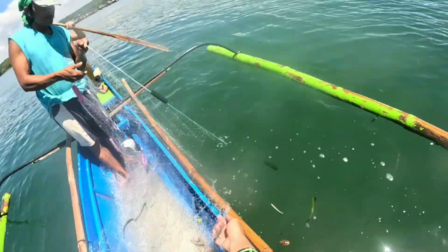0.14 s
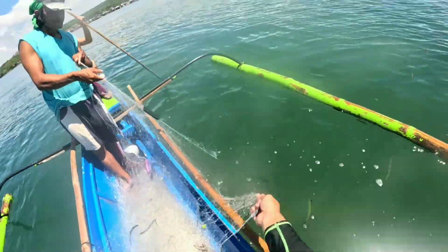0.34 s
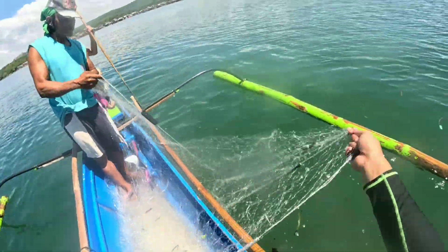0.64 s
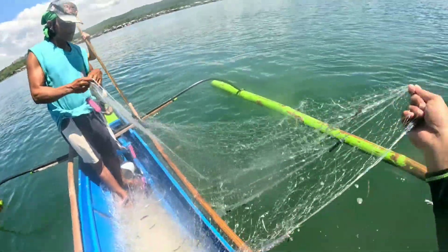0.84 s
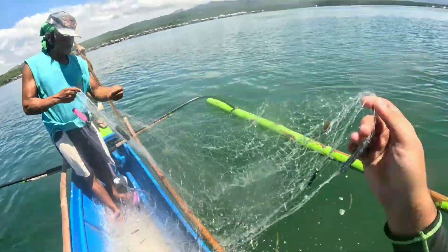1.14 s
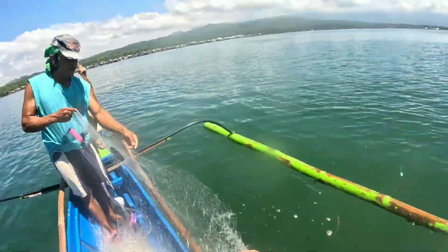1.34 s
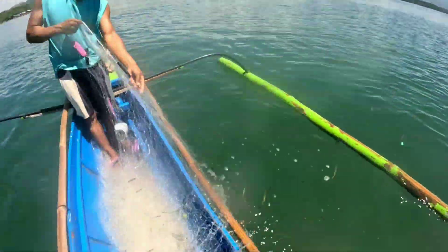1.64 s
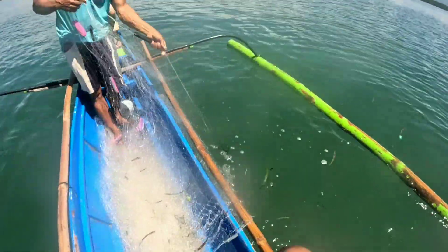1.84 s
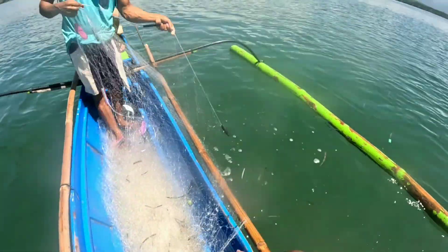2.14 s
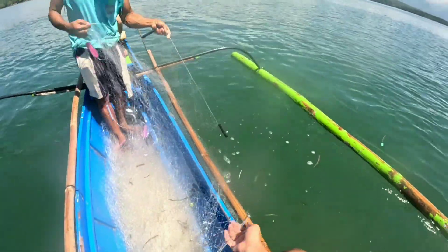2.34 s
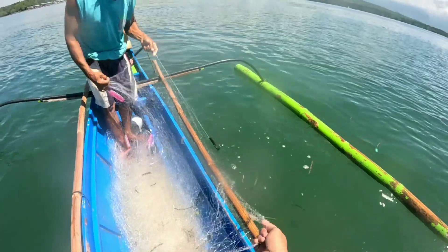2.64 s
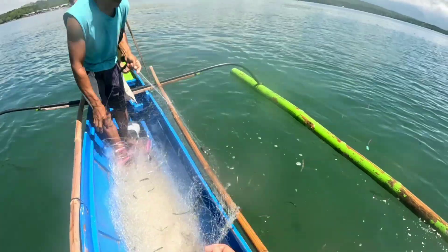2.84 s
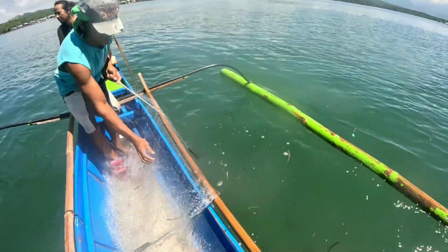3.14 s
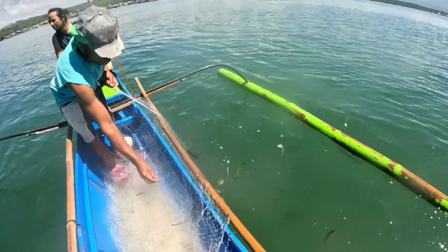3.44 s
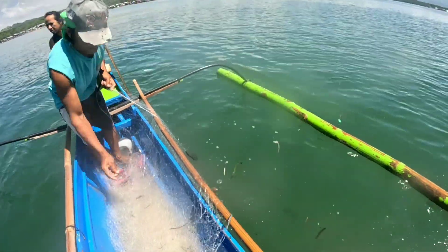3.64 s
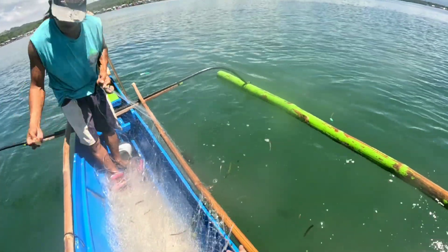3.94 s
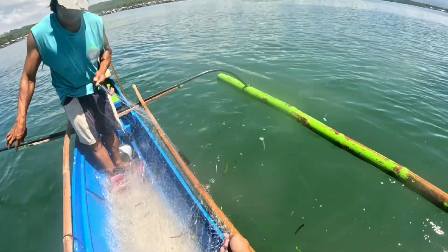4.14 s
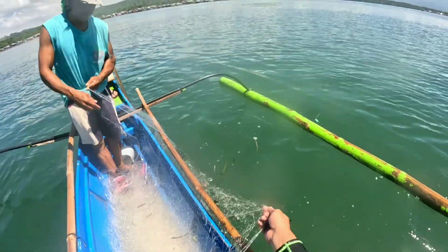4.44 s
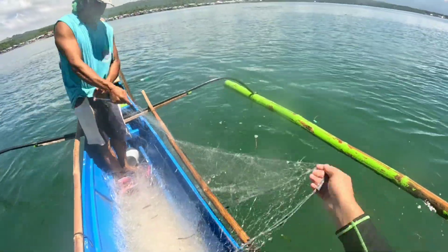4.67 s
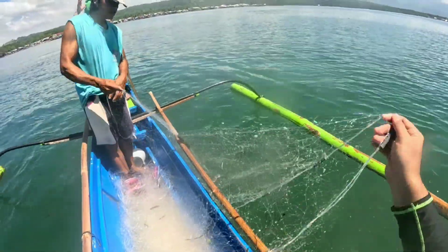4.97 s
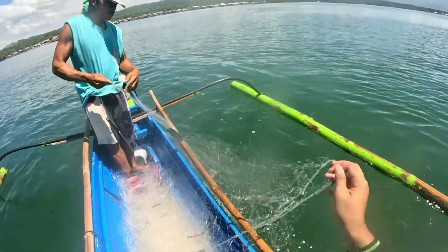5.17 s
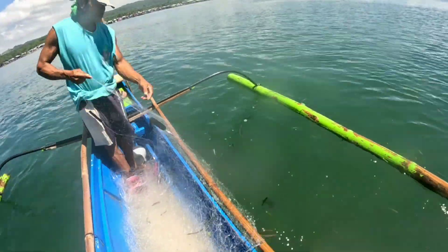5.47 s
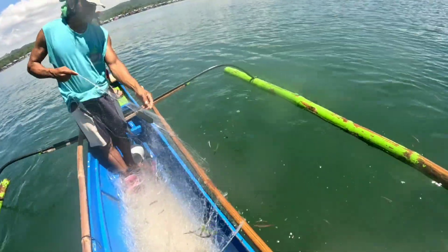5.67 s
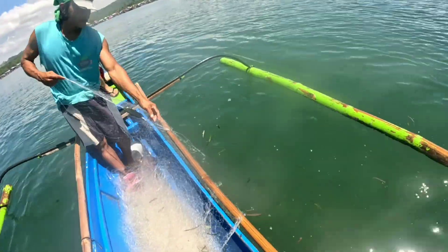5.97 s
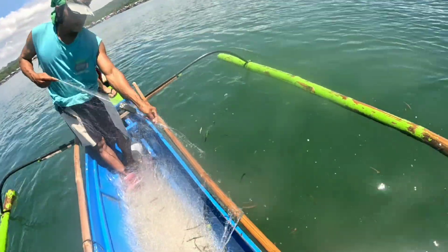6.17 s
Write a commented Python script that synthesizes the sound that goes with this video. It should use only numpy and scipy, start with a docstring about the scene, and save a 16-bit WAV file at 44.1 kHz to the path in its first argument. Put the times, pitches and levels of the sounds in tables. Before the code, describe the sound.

A wet nylon net is hauled by hand into a wooden boat, with sinkers knocking wood, mesh crackling, water dripping and low rumble beneath.

```python
"""In a wooden outrigger boat on calm water a wet nylon net is hauled in by hand, heard from the hauler's place.
Sinkers knock on the side and padded bumps hit the hull: noisy contacts that ring the modes of the wood.
Strands snap as short bands of noise; knots and mesh tap, judder and crackle over the rail as plucked tones,
ringing grains and noise; drips are gliding air bubbles, the trickle a random shower of them. Shaped noise is
the rumble of moving air; decaying low tones are the boat's slow swings and one short thud; a faint hiss stays."""
import sys
import numpy as np
from scipy import signal
from scipy.fft import rfft, irfft, next_fast_len
from scipy.io import wavfile
from scipy.ndimage import map_coordinates

SR = 44100
rng = np.random.default_rng(int(sys.argv[2]) if len(sys.argv) > 2 else 0)


def wrap_up_sound(samples):
    """Save the sound to the file named by the first command line argument, as 16-bit audio."""
    columns = np.atleast_2d(samples).T
    # keep every value between -1 and 1, then stretch to whole-number steps
    tamed = np.clip(columns, -1, 1)
    steps = np.round(tamed * 32767).astype(np.int16)
    wavfile.write(sys.argv[1], SR, steps)


N = 278271

# spectrum of trickling water: f/Hz, density/dB
TRICKLE = [(300, 0), (520, 0), (780, -25.5), (1020, 0), (1300, -3.5), (1700, -9), (2100, -4.5),
           (2500, -9.5), (3500, -29.5), (6000, -44)]
# spectrum of crackling mesh: f/Hz, density/dB
MESH = [(1500, -3.5), (2500, 0.5), (3300, 4.5), (4200, 3), (5000, -2), (7000, 5.5), (8800, 4.5),
        (10000, -7), (12000, -43.5)]
# spectrum of wet strands sliding: f/Hz, density/dB
SWISH = [(1000, 5.5), (2200, 4), (3500, 0), (4500, -13), (8000, -10.5), (11000, -48)]


def amp(db):
    """Decibels to gain."""
    return 10 ** (np.asarray(db) / 20)


def unit(x):
    """Scaled to rms 1."""
    return x / np.sqrt(np.mean(x ** 2) + 1e-20)


def along(points, hz):
    """(Hz, value) points read on a log frequency axis."""
    f, v = np.transpose(points)
    return np.interp(np.log(hz + 1), np.log(f + 1), v)


def filtered(x, response):
    """x times a response of frequency, zero-padded."""
    size = x.shape[-1]
    m = next_fast_len(size + 4096)
    return irfft(rfft(x, m) * response(np.fft.rfftfreq(m, 1 / SR)), m)[..., :size]


def coloured(x, spectrum):
    """x through a spectrum, at rms 1."""
    return unit(filtered(x, lambda hz: amp(along(spectrum, hz))))


def fade(t, t60):
    """A decay of 60 dB in t60."""
    return np.exp(-np.log(1000) * t / t60)


def swell(start, hold, attack, release):
    """A gain that builds up to start, holds, then dies away; attack and release are time constants in s."""
    t = np.arange(N) / SR - start
    return np.exp(np.minimum(t, 0) / attack - np.maximum(t - hold, 0) / release)


def clumping(per_s, depth_db):
    """A gain that wanders smoothly between random levels, per_s of them a second."""
    position = np.arange(N) * per_s / SR
    levels = rng.standard_normal(int(position[-1]) + 2)
    return amp(depth_db * map_coordinates(levels, [position]))


def add(track, s, sound):
    """Mix a sound into a track at time s."""
    part = track[max(round(s * SR), 0):][:len(sound)]
    part += sound[:len(part)]


def bubble(t, hz, cycles, glide):
    """A trapped air bubble rings for a t60 of so many cycles and glides in pitch as it moves under the surface."""
    life = cycles / hz
    phase = 2 * np.pi * hz * (t + glide * t * t / (2 * life))
    return np.sin(phase) * fade(t, life) * (1 - np.exp(-t * hz))


def grains(per_s, hz, spread, cycles, scatter_db, size):
    """A random shower of tiny ringing grains, pitched within spread octaves either way, at rms 1."""
    count = int(per_s * N / SR)
    when, pitch, strength = rng.random((count, 3)).T
    pitches = hz * 2 ** (spread * (2 * pitch - 1))
    gains = amp(-scatter_db * np.log(np.maximum(strength, .02)))
    waves = gains[:, None] * bubble(np.arange(size) / SR, pitches[:, None], cycles, glide=0.13)
    places = (when * N).astype(int)[:, None] + np.arange(size)
    return unit(np.bincount(places.ravel(), waves.ravel(), N)[:N])


def wood_ring(t, scatter_db, ring_share):
    """The boat's modes, at new strengths and signs for each contact; ring_share scales their t60."""
    # modes of the wooden boat: f/Hz, level/dB, t60/s
    modes = [(209.1, -13, 0.22), (300, -12, 0.16), (390.3, -12, 0.17), (470, -7, 0.12), (640, -8, 0.088),
             (740, -3, 0.09), (940, -7, .07), (1005, -3, .07), (1055, -3, .075), (1152, 0, .09),
             (1229, -2, .09), (1355, -1, .07), (1435, -1, .06), (1585, 0, .055), (1690, -6, .065),
             (1800, -1, .05), (2010, 2, .042), (2130, 1, .042), (2800, -10, .04), (3080, -8, .045),
             (3420, -10, .04), (4300, -12, .03)]
    hz, db, t60 = np.transpose(modes)[:, :, None]
    gains = amp(db + scatter_db * rng.standard_normal(db.shape)) * rng.choice([-1, 1], db.shape)
    return np.sum(gains * np.sin(2 * np.pi * hz * t) * fade(t, t60 * ring_share), axis=0)


def blow(voice, hardness_db, ring_share, rattle_db, pad_hz=None):
    """One contact rattles and rings the boat; hardness sets the balance of the registers."""
    # hull, plank, rail and crack registers: low f/Hz, high f/Hz
    registers = [(150, 850), (900, 1520), (1480, 2330), (2400, 8500)]
    # spectrum of a contact's noise: f/Hz, density/dB
    clatter = [(150, -2), (400, 3.5), (700, 0), (1100, 3.5), (1700, -21), (2150, 15), (2600, 3),
               (3200, -10.5), (4300, -11.5), (5500, -19.5), (8500, -23)]
    t = np.arange(SR // 4) / SR
    decay = fade(t, .035) + amp(-15) * fade(t, .12)
    rattle = amp(rattle_db) * coloured(rng.standard_normal(len(t)), clatter) * decay
    sound = rattle + wood_ring(t, scatter_db=3, ring_share=ring_share)
    if pad_hz:
        sound = signal.sosfilt(signal.butter(2, pad_hz, fs=SR, output='sos'), sound)
    out = np.zeros(len(t))
    for band, (db, slope) in zip(registers, voice):
        part = signal.sosfilt(signal.butter(5, band, 'band', fs=SR, output='sos'), sound)
        onset_level = np.std(part[:SR // 90])
        out += amp(db + slope * hardness_db) * part / onset_level
    return out


def sinkers():
    """Sinkers land on one end and then the other; the struck spot adds its own ring. Two clink together."""
    # sinkers on the side: t/s, level/dB, hardness/dB, spot f/Hz, kick/dB, gap to other end/s, its level/dB
    strikes = [(0.502, -48, 4, 1320, 7, .004, 3), (0.555, -64.5, 2, 1620, 0, 0.0036, -1),
               (0.595, -68.5, 4.5, 1300, 13, 0.013, -7), (0.689, -63, 4, 1105, 9, 0.014, -20),
               (2.655, -59, 10, 2000, 21, .002, -7.5), (2.964, -30.5, 0.5, 1256, 11.5, 0.016, 2.5),
               (3.047, -38, 1.5, 1494, 0, 0.01, -6), (3.403, -52, -34, 1040, 13, 0.0048, 11),
               (3.688, -52.5, 3, 1380, -11, 0.0048, 2), (5.484, -32.5, 1, 1083, 5.5, 0.0067, 0),
               (5.5813, -45.5, 3.5, 1800, 15.5, 0.0097, 4)]
    # one row per register: level/dB, slope/(dB per dB of hardness)
    voice = [(-11.5, 0.43), (-0.5, -0.04), (-9, 2), (-17.5, 2.5)]
    kick_peak_s, spot_db, spot_t60_s = .0007, 3, .06
    clink_s, clink_hz, clink_db, clink_t60_s = .5025, 4200, -40.5, 0.022
    out, t = np.zeros(N), np.arange(SR // 4) / SR
    for s, db, hardness_db, hz, kick_db, gap_s, second_db in strikes:
        tone = np.sin(2 * np.pi * hz * t)
        kick = amp(kick_db) * t / kick_peak_s * np.exp(1 - t / kick_peak_s)
        add(out, s, amp(db + spot_db) * tone * fade(t, spot_t60_s))
        for delay_s, end_db in ((0, 0), (gap_s, second_db)):
            boat = blow(voice, hardness_db, ring_share=1, rattle_db=5)
            add(out, s + delay_s, amp(db + end_db) * (boat + kick * tone))
    clink = np.sin(2 * np.pi * clink_hz * t) * fade(t, clink_t60_s)
    add(out, clink_s, amp(clink_db) * clink)
    return out


def bumps():
    """Padded hands and feet settle on the hull in weaker, softer contacts that damp the wood; a plank rings."""
    # hands and feet on the hull: t/s, level/dB, hardness/dB, muffled above f/Hz
    contacts = [(0.169, -67, 3.5, 400), (1.379, -49.5, 2.5, 434), (4.588, -43, 0, 400),
                (4.62, -52, -12, 250), (4.698, -48, -5, 198), (6.199, -63.5, 2, 320)]
    # one row per register: level/dB, slope/(dB per dB of hardness)
    voice = [(6, 0.5), (-4.5, 3), (-24.5, 4.5), (-25.5, -0.5)]
    settle_s, settle_loss_db, settle_softer_db = 0.0095, 1.5, 0.5  # per contact
    plank_hz, plank_db, plank_t60_s = 989, 13, 0.088
    plank_slope = 2.5  # dB per dB of hardness
    out, t = np.zeros(N), np.arange(SR // 4) / SR
    plank = np.sin(2 * np.pi * plank_hz * t) * fade(t, plank_t60_s) * (1 - np.exp(-t / 0.0059))
    for s, db, hardness_db, pad_hz in contacts:
        add(out, s, amp(db + plank_db + plank_slope * hardness_db) * plank)
        for k in range(5):
            softer_db = hardness_db - k * settle_softer_db
            contact = blow(voice, softer_db, ring_share=0.6, rattle_db=14, pad_hz=pad_hz)
            add(out, s + k * settle_s, amp(db - k * settle_loss_db) * contact)
    return out


def snaps():
    """Taut wet strands slip free with a small tick and a rough, short ring of narrow-band noise."""
    # loudest strands: t/s, reference level/dB, f/Hz
    strands = [(0.061, -42, 4200), (0.501, -49.5, 8200), (0.859, -50, 3500), (0.95, -43, 3260),
               (1.014, -46, 3700), (1.41, -46, 3400), (1.474, -38, 3100), (2.377, -42.5, 3000),
               (2.412, -46.5, 5800), (2.425, -43, 6630), (2.581, -44.5, 4100), (2.609, -41, 3040),
               (2.655, -51.5, 3380), (2.685, -42.5, 3380), (2.738, -41.5, 3450), (2.77, -42.5, 3800),
               (2.82, -37, 3750), (2.937, -47, 3340), (3.078, -54, 4460), (3.095, -47, 4160),
               (3.687, -44.5, 4120), (3.838, -48.5, 4130), (4.879, -56, 6960), (4.897, -44.5, 6950),
               (5.003, -42.5, 3190), (5.074, -41.5, 3740), (5.127, -46.5, 6750), (5.148, -43, 3900),
               (5.206, -46.5, 3830)]
    tick_db, ring_db, ring_q = -21, -12.0, 11  # dB re reference level
    out, t = np.zeros(N), np.arange(SR // 16) / SR
    for s, db, hz in strands:
        tick = coloured(rng.standard_normal(len(t)), MESH) * fade(t, 0.028)
        b, a = signal.iirpeak(hz, ring_q, SR)
        ring = unit(signal.lfilter(b, a, rng.standard_normal(len(t)))) * fade(t, 0.033)
        add(out, s, amp(db) * (amp(tick_db) * tick + amp(ring_db) * ring))
    return out


def knots():
    """Larger knots catch on the rail at varying spots and pluck it: dull, scratchy, quickly damped taps."""
    # knots jumping the rail: t/s, level/dB
    jumps = [(1.291, -45), (1.319, -40), (1.381, -32), (1.397, -33.5), (1.403, -28.5), (1.491, -38),
             (1.516, -31), (1.542, -38.5), (1.568, -42), (1.583, -39.5), (3.882, -32)]
    rail_hz, spread_share, t60_s, scratch_db = 1060, .06, .025, -16
    out, t = np.zeros(N), np.arange(SR // 16) / SR
    for s, db in jumps:
        hz = rail_hz * (1 + spread_share * rng.standard_normal())
        tap = np.sin(2 * np.pi * hz * t) * (1 - np.exp(-t * hz))
        scratch = amp(scratch_db) * coloured(rng.standard_normal(len(t)), SWISH)
        add(out, s, amp(db) * (tap + scratch) * fade(t, t60_s))
    return out


def drags():
    """Knots judder over the rail in short strokes and shake planks and hull; strands swish, the hull groans."""
    # strokes over the rail: middle t/s, half length/s, level/dB before trim, hull re planks/dB
    strokes = [(1.328, 0.029, -46, -4.5), (1.399, 0.027, -41.5, -5.5), (1.478, 0.015, -48, -10),
               (1.521, 0.032, -51, -14.5), (1.595, 0.026, -55, -5.5), (1.782, 0.064, -54, -16.5),
               (3.412, 0.016, -42.5, -20.5), (5.714, 0.07, -65, 6.5)]
    # spectrum of the hull under the net: f/Hz, density/dB
    scrape = [(150, -6), (300, -10), (420, -1), (505, 4), (620, -1), (800, -16), (1500, -35)]
    trim_db = -2.0
    groan_s, groan_half_s, groan_hz, groan_db = 1.41, 0.0075, 501, -30
    out, t = np.zeros(N), np.arange(N) / SR
    judder = grains(per_s=1100, hz=1700, spread=1.3, cycles=6, scatter_db=3, size=400)
    planks = coloured(judder, TRICKLE)
    spatter = clumping(per_s=220, depth_db=4)
    swish = amp(-7.5) * coloured(spatter * rng.standard_normal(N), SWISH)
    hull = coloured(rng.standard_normal(N), scrape)
    for s, half_s, db, hull_db in strokes:
        stroke = np.exp(-((t - s) / half_s) ** 2)
        out += amp(db + trim_db) * stroke * (planks + swish + amp(hull_db) * hull)
    groan = np.exp(-((t - groan_s) / groan_half_s) ** 2) * np.sin(2 * np.pi * groan_hz * t)
    return out + amp(groan_db) * groan


def drips():
    """Drops plink into the water beside the hull: a ringing air bubble and a faint splash of noise."""
    # biggest drops: t/s, level/dB, f/Hz, glide over one t60/share of f
    drops = [(0.326, -51.5, 1600, -0.003), (.798, -53, 1027, -0.14), (0.882, -41.5, 1370, -0.24),
             (0.94, -48.5, 5400, 0), (0.94, -39, 1092, -0.18), (.977, -56, 5360, 0),
             (1.032, -49.5, 5350, 0.038), (1.147, -53, 1670, 0.44), (1.995, -53.5, 1410, 0.083),
             (2.014, -48, 1140, -0.06), (2.138, -46, 1980, .05), (2.448, -51, 2060, 0.11),
             (2.495, -46, 1990, 0.11), (2.541, -47, 1090, 0.03), (2.567, -42.5, 2100, 0.11),
             (2.682, -44, 1460, -0.46), (2.702, -49, 810, -0.17), (2.874, -48, 1104, 0.34),
             (3.554, -49.5, 1077, 0.35), (3.614, -51, 1185, 0.56), (3.801, -49, 1126, 0.15),
             (3.941, -43.5, 980, -0.04), (4.145, -47, 987, 0.018), (4.77, -57, 1280, 0),
             (4.956, -53.5, 1350, 0), (5.043, -45.5, 1050, 0.16), (5.668, -50, 1560, 0)]
    out, t = np.zeros(N), np.arange(SR // 8) / SR
    for s, db, hz, glide in drops:
        splash = coloured(rng.standard_normal(len(t)), TRICKLE) * fade(t, 0.11)
        plink = bubble(t, hz, cycles=63, glide=glide)
        add(out, s, amp(db) * (plink + amp(-20.5) * splash))
    return out


def wet_net():
    """Water trickles from the rising net while its mesh crackles; swung aboard, it sheds a shower."""
    # pulls on the net: start t/s, hold/s, trickle/dB, mesh/dB
    pulls = [(0.888, 0.14, -62.5, -71), (1.472, 0.14, -58.5, -69.5), (2.505, 0.55, -64.5, -67),
             (3.543, 0.38, -61, -75), (5.051, 0.031, -57.5, -66.5), (5.65, 0.21, -67, -83),
             (6.269, 0.024, -65.5, -65)]
    attack_share, release_share, drain_share = 0.6, 0.34, 0.59  # time constants over the hold
    idle_trickle_db, idle_mesh_db = -77, -78  # net hanging between pulls
    shower_s, shower_hold_s, shower_db = 2.93, 0.04, -66.5
    flow, strain = amp(idle_trickle_db), amp(idle_mesh_db)
    for s, hold_s, trickle_db, mesh_db in pulls:
        draining = swell(s, hold_s, attack=0.093, release=drain_share * hold_s)
        pulling = swell(s, hold_s, attack_share * hold_s, release_share * hold_s)
        flow = np.hypot(flow, amp(trickle_db) * draining)
        strain = np.hypot(strain, amp(mesh_db) * pulling)
    shed = amp(shower_db) * swell(shower_s, shower_hold_s, attack=1.0, release=0.11)
    drops = grains(per_s=480, hz=1500, spread=.65, cycles=32, scatter_db=2.2, size=1400)
    spurts = clumping(per_s=20, depth_db=2.5)
    trickle = coloured(spurts * (drops + .5 * rng.standard_normal(N)), TRICKLE)
    crackle = grains(per_s=1400, hz=4700, spread=1.1, cycles=40, scatter_db=3.4, size=400)
    bunches = clumping(per_s=45, depth_db=2.4)  # strands come free in bunches
    mesh = coloured(bunches * (crackle + 0.74 * rng.standard_normal(N)), MESH)
    shower = grains(per_s=300, hz=2300, spread=.75, cycles=35, scatter_db=2.6, size=1200)
    return flow * trickle + strain * mesh + shed * shower


def rumble():
    """Moving air rumbles as low noise."""
    # spectrum of the rumble: f/Hz, density/dB
    spectrum = [(12, 1.5), (22, 2.5), (33, -3), (48, -16), (80, -30), (140, -33.5), (210, -39.5),
                (300, -49), (800, -70), (1300, -115)]
    # course of the rumble: t/s, level/dB
    course = [(0, -28.5), (.75, -36.5), (1.5, -26), (2.4, -34), (3.4, -32.5), (5.1, -33), (6.3, -31.5)]
    level_db = np.interp(np.arange(N) / SR, *np.transpose(course))
    return amp(level_db) * coloured(rng.standard_normal(N), spectrum)


def thumps():
    """Soft blows set the boat swinging slowly, with a weaker higher tone; at 1.784 s a short low thud."""
    # slow swings below 30 Hz and one short thud: t/s, level/dB, f/Hz, t60/s
    low_tones = [(1.305, -10.5, 23.44, 0.42), (1.784, -21.5, 95.6, 0.027), (4.594, -14, 26.47, 0.8),
                 (4.702, -16, 28.8, 0.94)]
    rise_share = 0.024  # rise time constant over t60
    upper_ratio, upper_db, upper_t60_s = 3.6, -21.5, 0.79  # this decay is on top of the low tone's own
    out, t = np.zeros(N), np.arange(SR) / SR
    for s, db, hz, t60 in low_tones:
        low = np.sin(2 * np.pi * hz * t)
        upper = amp(upper_db) * np.sin(2 * np.pi * upper_ratio * hz * t) * fade(t, upper_t60_s)
        envelope = fade(t, t60) * (1 - np.exp(-t / (rise_share * t60)))
        add(out, s, amp(db) * (low + upper) * envelope)
    return out


def hiss():
    """A faint steady hiss: independent mid and side noise, spread to left and right."""
    # spectrum of the hiss: f/Hz, density/dB
    air = [(700, 3), (1200, 7.5), (2600, -2), (4000, -5), (5500, -4), (8700, -11.5), (10000, -14.5),
           (11500, -49)]
    mid, side = coloured(rng.standard_normal((2, N)), air)
    return amp(-72.0) * (mid + amp(-1.5) * np.array([side, -side]))


def ports(hz):
    """Two microphone ports differ in phase and level, split evenly between left and right."""
    # phase between ports: f/Hz, left lead/rad
    lead = [(100, 0), (300, .3), (450, .6), (1200, .5), (1550, -.2), (1830, 0), (1930, -1.8), (2200, -1.9),
            (2450, -2.6), (2750, -1.8), (2980, -.2), (3270, -1.3), (3600, -.2), (4400, .2), (6000, 0)]
    # level between ports: f/Hz, left minus right/dB
    balance = [(150, -.6), (450, -2), (700, .5), (1050, 1.5), (1620, -1.5), (1800, 4), (1980, -2.3),
               (2650, -1), (2900, 6), (3200, .5), (3650, 2.5), (4400, -2), (5600, -2.3), (7000, .2)]
    left_right = np.array([[.5], [-.5]])
    return np.exp(1j * left_right * along(lead, hz)) * amp(left_right * along(balance, hz))


def scene():
    """The work on the boat is close by, over a faint steady hiss."""
    work = sinkers() + bumps() + snaps() + knots() + drags()
    water = drips() + wet_net()
    low = rumble() + thumps()
    return filtered(work + water + low, ports) + hiss()


def record(dry):
    """Nothing passes above a sharp band limit."""
    top_hz = 13150
    return filtered(dry, lambda hz: hz < top_hz)


dry = scene()
out = record(dry)
wrap_up_sound(out)
```